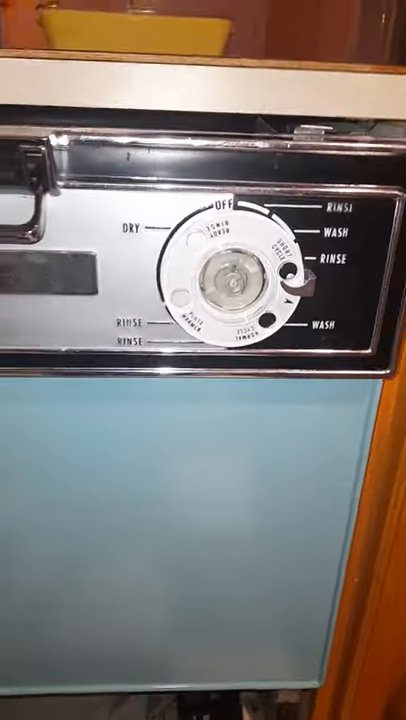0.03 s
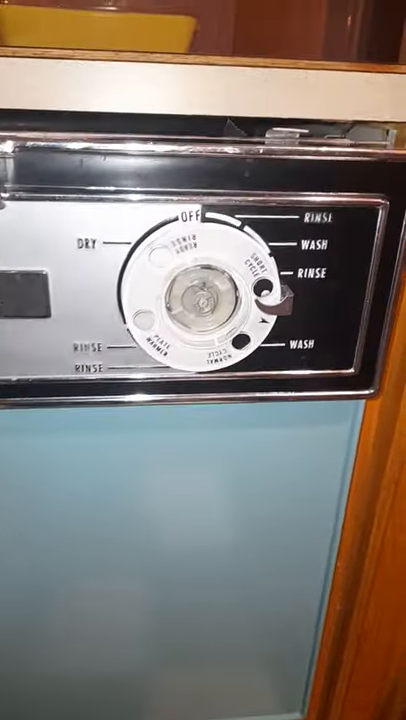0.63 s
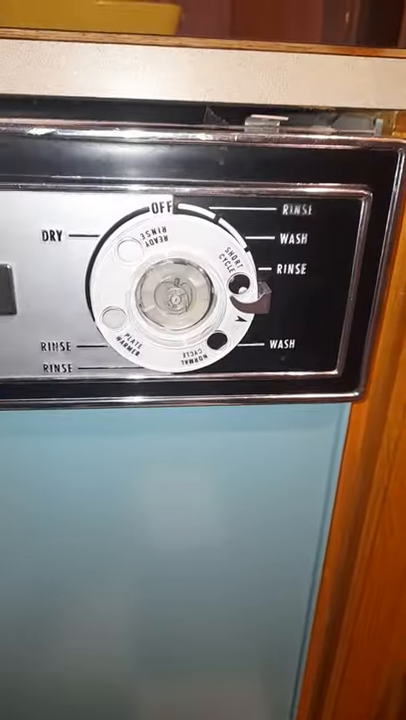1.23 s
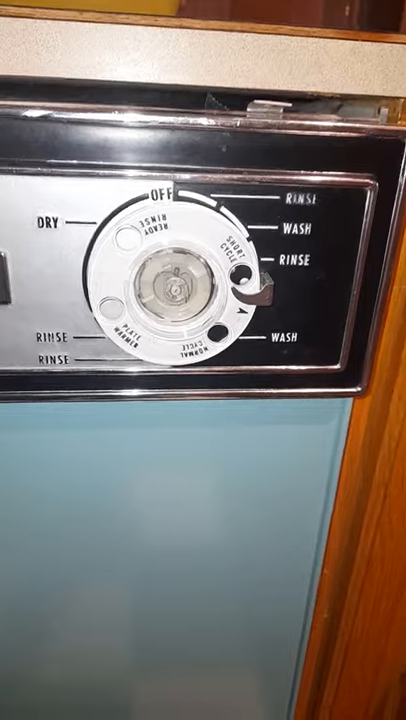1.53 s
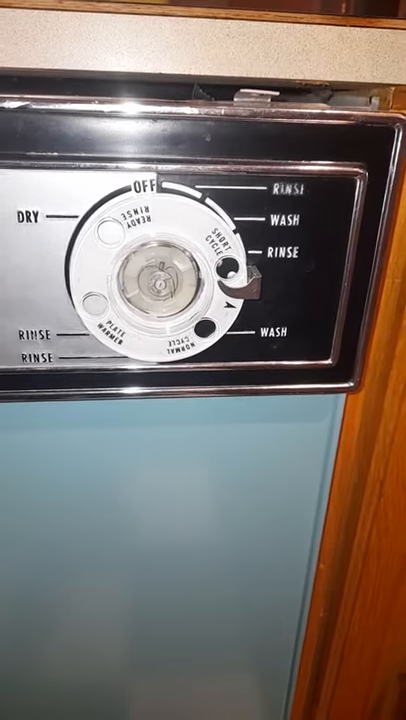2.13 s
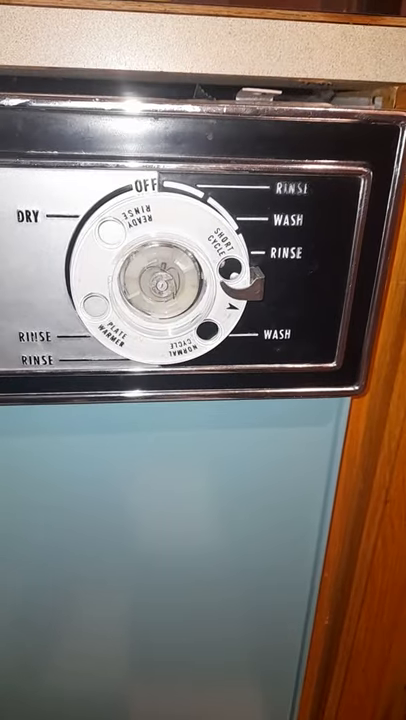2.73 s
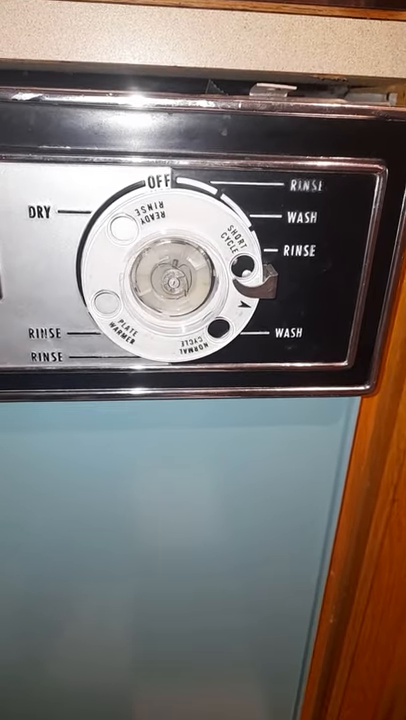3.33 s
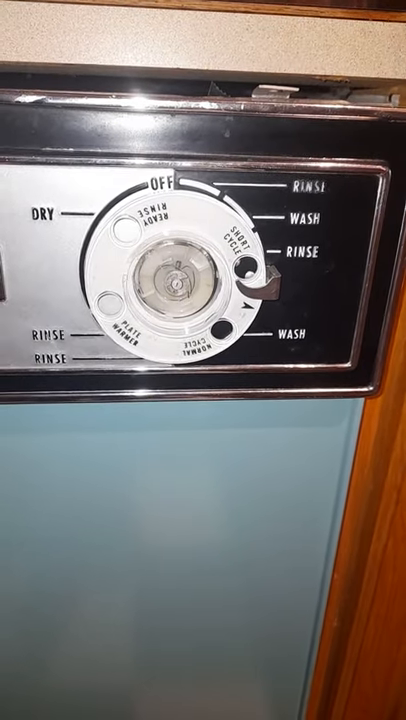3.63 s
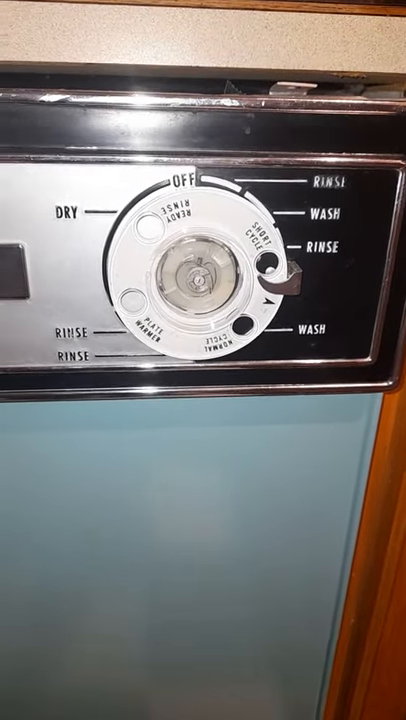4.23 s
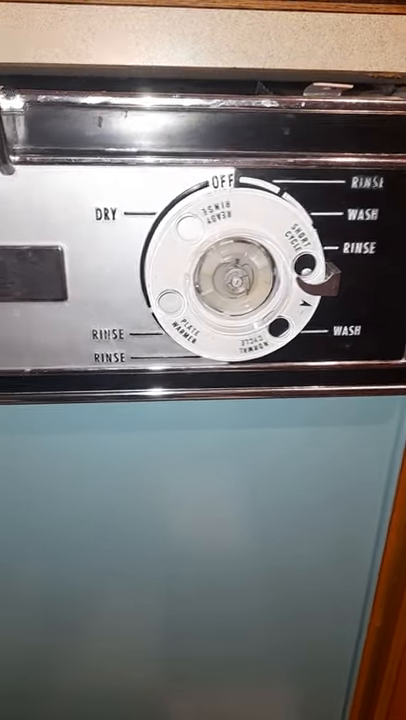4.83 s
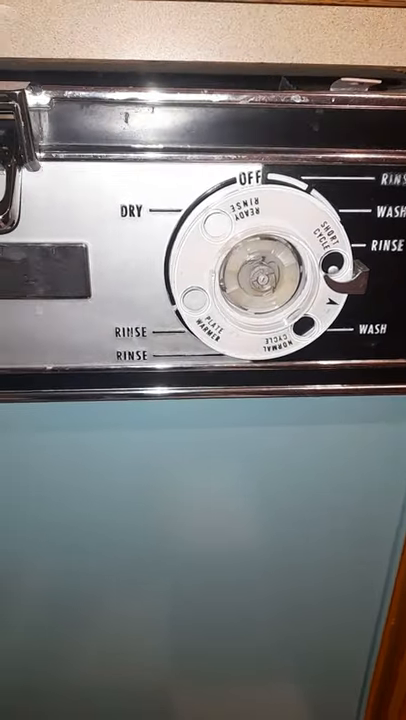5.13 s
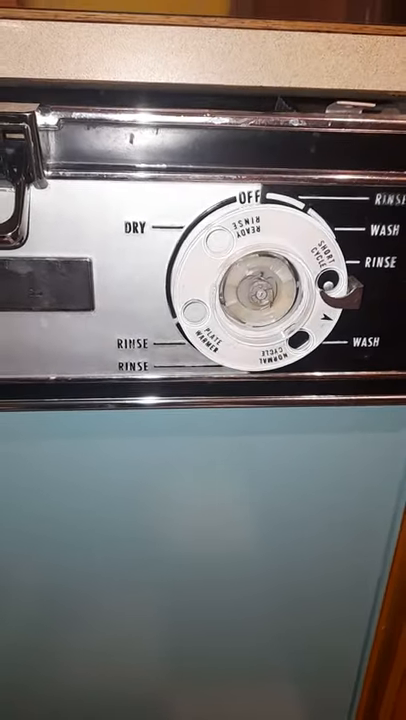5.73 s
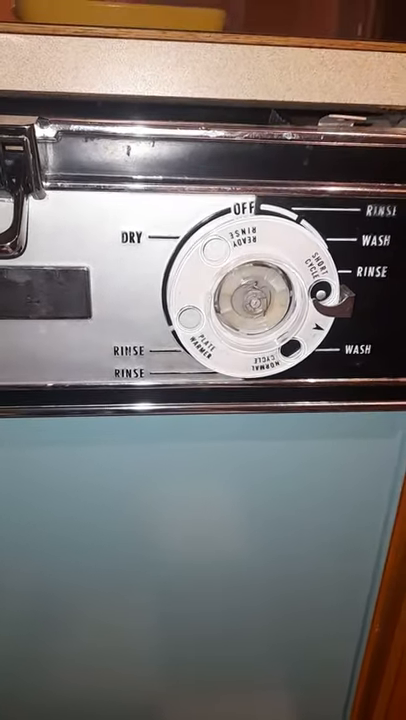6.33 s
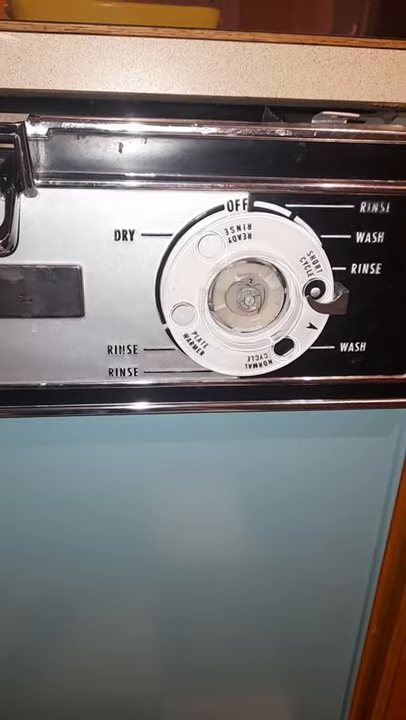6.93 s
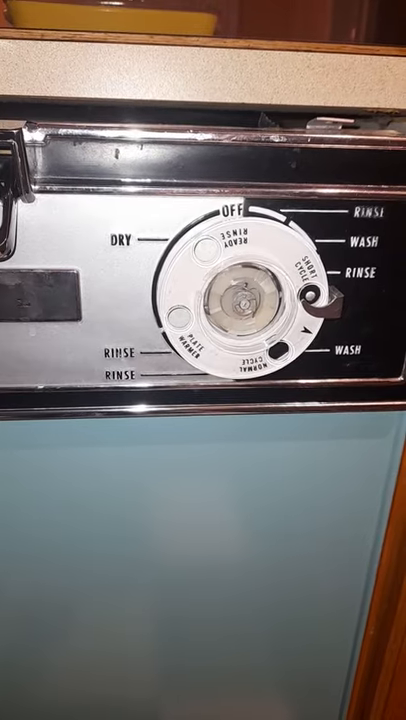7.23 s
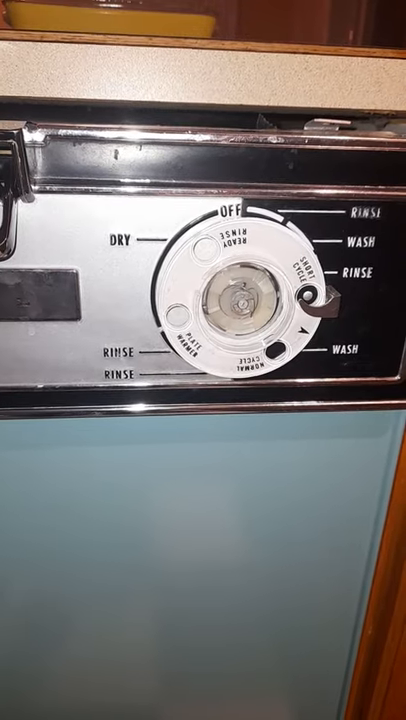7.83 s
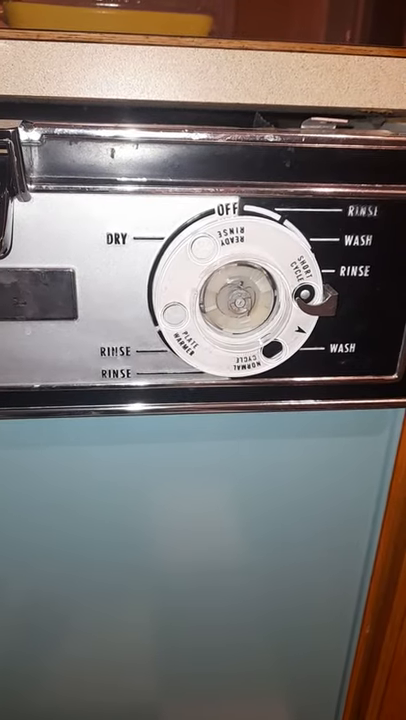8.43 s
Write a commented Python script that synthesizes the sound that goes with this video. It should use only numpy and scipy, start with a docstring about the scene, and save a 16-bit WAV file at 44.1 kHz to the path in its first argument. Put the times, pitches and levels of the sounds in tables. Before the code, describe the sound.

An old dishwasher runs in mid-cycle in a kitchen, heard close to its door. A low motor hum dominates, swelling and sagging over a steady rush of churning water. Spray sweeps in turn across the door, where it drums and fizzes, and over the racks, where dishes ring faintly. Two soft, hollow water slaps come about three seconds in, and a small sharp tick near the end.

```python
"""A motor hum over rushing, churning water: an old dishwasher in mid-cycle, close to its door.
The spray arm's jets sweep in turn over the door, where drops drum and fizz at the seal, and over
the racks, where dishes ring, the water churns and the hum sags and throbs. Pump tones flutter
under the hum; larger drops ping on the steel tub. Two slugs of water slap the walls and two
small ticks sound."""
import sys
import numpy as np
from scipy import signal
from scipy.fft import rfft, irfft, next_fast_len
from scipy.io import wavfile

SR = 44100
rng = np.random.default_rng(int(sys.argv[2]) if len(sys.argv) > 2 else 0)


def dump(signal):
    """Clip the signal to [-1, 1] and save it as 16-bit WAV at the path in sys.argv[1]."""
    limited = np.clip(np.atleast_2d(signal).T, -1, 1)
    pcm = np.round(limited * 32767).astype(np.int16)
    wavfile.write(sys.argv[1], SR, pcm)


N = 378819
TIME_S = np.arange(N) / SR
FFT_SIZE = next_fast_len(N + SR // 10)
BIN_HZ = np.maximum(np.arange(FFT_SIZE // 2 + 1) * SR / FFT_SIZE, 1)
MAINS_HZ, SHAFT_HZ = 60.02, 59.3
RACK_RISE_S, RACK_FALL_S = 0.076, 0.15

# spray falling all over the tub: (time [s], base level [dB])
WASH_LEVELS = [(0, -39), (2.3, -40), (5.2, -39.5), (7.0, -40), (8.59, -42)]
# small hard ticks: (time [s], level [dB])
TICK_EVENTS = [(2.792, -52), (7.302, -37.5)]
# water slugs on door or wall: (time [s], pitch [Hz], level [dB])
SLAP_EVENTS = [(2.835, 460, -38), (3.135, 960, -42.5)]
# jet on the door: (full-on time [s], hold [s], base drum level [dB], base fizz level [dB])
DOOR_JETS = [(.91, 0.15, -40.5, -56.5), (2.644, 0.27, -40.5, -57.5), (3.15, 0.57, -47.5, -76),
             (4.34, 0.13, -43, -59), (4.84, 0.81, -44.5, -59.5), (5.996, 0.069, -45, -77),
             (7.386, 0.057, -39.5, -57)]
# jet on the racks: (full-on time [s], hold [s], plate gain [x], bowl gain [x], mean hum sag [dB])
RACK_JETS = [(0.273, 0.14, 0.66, 1.14, 0.2), (1.506, .12, 1.05, 0.85, 1.4), (3.32, 0.22, 0.84, .9, 5.5),
             (4.7, .9, .35, 0.23, -0.35), (5.79, 0.14, 0.9, 0.6, 0.6), (6.463, 0.13, 1.15, .85, 3),
             (7.676, 0.44, 1.15, 0.8, 2.6), (8.27, .32, .85, 0.46, 0.6)]
# jet on a pan: (full-on time [s], hold [s])
PAN_JETS = [(8.05, 0.2)]
# water stirred up: (full-on time [s], hold [s], base level [dB])
CHURN_EVENTS = [(0, 0.13, -34), (1.346, 0.56, -35.8), (3.267, 0.33, -33.5), (5.793, 0.13, -31.5),
                (6.45, 0.15, -39), (7.62, .3, -44), (8.54, .05, -37.5)]
# motor hum before sag: (time [s], base level [dB])
HUM_LEVELS = [(0.0, -15.5), (0.31, -16), (0.54, -18.5), (1.12, -18.2), (1.32, -16.5), (1.64, -19.9),
              (2.1, -14), (2.55, -19.6), (3.23, -17.5), (3.99, -15.5), (4.28, -19.1), (4.53, -17.5),
              (4.76, -20.5), (5.84, -21), (6.18, -14.6), (6.82, -17), (7.11, -17), (7.46, -19.2),
              (7.54, -14.5), (7.8, -21.5), (8.29, -19.5), (8.59, -18.5)]
# motor tones: (frequency [x mains rate], gain [dB])
MOTOR_HARMONICS = [(2, 0), (4, -35.5)]
# pump tones: (frequency [x shaft rate], base level [dB], flutter depth [x], swell [dB/dB of churn])
PUMP_HARMONICS = [(1, -49.5, 0.3, .05), (3, -42.5, 0.4, 0.73), (6, -48.5, 0.52, 0.44)]
# door panel and tub resonances: (frequency [Hz], width [Hz], lift [dB])
PANEL_RESONANCES = [(229.4, 17, 9), (290.5, 23, 5.5), (433, 19, 2), (458, 17, 7.5), (516.3, 12.5, 8.5),
                    (534, 18, 7), (594, 29, 7.5), (666, 28, 8), (802, 33, 3), (825, 24, 5),
                    (953.5, 20, 9.5), (1014, 31, 6), (1112, 27, 6.5), (1530, 35, 5.5), (1675, 36, 3.5),
                    (1847, 34, 0), (1880, 34, 7), (2236, 96, 4), (3000, 190, 1)]
# ring of steel walls, plates and glasses, bowl, pan: (frequency [Hz], width [Hz], gain [dB])
WALL_RESONANCES = [(949.5, 18, 10.5), (1024, 17, -2), (1805, 21, 11), (1858, 10.3, 8)]
PLATE_RESONANCES = [(3635, 30, 0), (3700, 32, -7.5), (4060, 17, -0.5), (4410, 40, -7), (4626, 70, -0.5),
                    (4720, 42, -17), (4820, 70, -2.5), (5060, 36, 0.5), (5400, 270, -10.5), (6800, 50, -10)]
BOWL_RESONANCES = [(2020, 40, -10), (2110, 24, -2), (2170, 26, -2), (2228, 26, -7), (2745, 22, 2)]
PAN_RESONANCES = [(822, 4, -9), (1550, 17, -19)]
# source spectra: (frequency [Hz], relative density [dB])
WASH_SHAPE = [(30, -10.5), (90, 20), (250, -1.5), (340, 10), (395, -9.5), (700, 0.5), (1300, -3),
              (2000, 1.5), (3300, -5.5), (5000, -6.5), (6500, -6.5), (7300, -20.5), (8500, -26.5),
              (16000, -47)]
TICK_SHAPE = [(500, -8), (1800, -2), (2800, 22), (4000, -1), (8000, 4), (13000, 12), (16000, 3)]
FIZZ_SHAPE = [(3000, -38), (6500, -2.5), (8500, -10), (10000, -4), (11800, 0.5), (12750, 3.5),
              (13500, -7.5), (14500, 0), (16000, -13)]
DRUM_SHAPE = [(60, -9), (200, 5.5), (330, 2), (450, 3.5), (800, -3), (1300, -1), (2500, -7.5),
              (3500, -14.5), (6500, -33), (9000, -37)]
SUMP_SHAPE = [(20, -48), (48, -42), (66, -27), (80, 4), (100, 4.5), (135, 3.5), (165, 3.5), (200, -0.5),
              (215, -7.5), (300, -15), (500, -49)]
# sound field: (frequency [Hz], left-right correlation [-1..1])
STEREO_CORRELATION = [(60, 0.34), (160, .99), (270, 0.7), (450, 0.75), (740, 0.79), (1220, -0.096),
                      (2010, -0.27), (3330, -0.091), (5500, 0.025), (15000, 0)]
# microphone port colour: (frequency [Hz], left minus right [dB])
PORT_BALANCE = [(60, -7.5), (130, -2), (250, -2), (800, -1.8), (1200, 0), (1800, -5), (2700, -5),
                (4000, -2), (5300, -7.5), (6400, -9.5), (7100, -1), (8000, 8), (10000, 0.5), (12500, -2.5)]


def from_db(db):
    """Decibels to gain."""
    return 10 ** (np.asarray(db) / 20)


def over_time(points):
    """Table interpolated at every sample."""
    return np.interp(TIME_S, *np.transpose(points))


def over_hz(points):
    """Table interpolated over log frequency."""
    hz, value = np.transpose(points)
    return np.interp(np.log(BIN_HZ), np.log(hz), value)


def drift(rate_hz, step=40):
    """Slow random wander, rms 1: coarse noise through a two-pole low-pass."""
    pole = np.exp(-2 * np.pi * step * rate_hz / SR)
    noise = rng.standard_normal(N // step + 2002)
    slow = signal.lfilter([1], [1, -2 * pole, pole * pole], noise)[2000:]
    return np.interp(np.arange(N) / step, np.arange(len(slow)), slow / np.sqrt(np.mean(slow ** 2)))


def resonance(hz, width_hz):
    """One damped mode, peak gain 1."""
    return 1 / (1 + 1j * (BIN_HZ ** 2 - hz ** 2) / (BIN_HZ * width_hz))


def turbulence():
    """Two independent white noise streams."""
    return rng.standard_normal((2, FFT_SIZE))


def drops(per_s, spread_db):
    """Two streams of random impacts, many small, few large."""
    sizes = from_db(spread_db * np.minimum(rng.exponential(1, (2, FFT_SIZE)), 4))
    return sizes * np.sign(turbulence()) * (rng.random((2, FFT_SIZE)) < per_s / SR)


def radiate(streams, response):
    """Filter two streams into stereo: alike in the bass, diffuse in the treble; mid rms 1."""
    mid, side = rfft(streams) * response
    correlation = over_hz(STEREO_CORRELATION)
    side = side * np.sqrt((1 - correlation) / (1 + correlation))
    pair = irfft(np.array([mid + side, mid - side]), FFT_SIZE)[:, :N]
    return pair / np.sqrt(np.mean(pair.mean(axis=0) ** 2))


def sweeps(passes, rise_s, fall_s, lead_s=0):
    """One 0-1 envelope per pass: Gaussian rise, hold, Gaussian fall."""
    start_s, hold_s = np.transpose(passes)[:2, :, None]
    since_s = TIME_S + lead_s - start_s
    rise = np.minimum(since_s, 0) / rise_s
    fall = np.maximum(since_s - hold_s, 0) / fall_s
    return np.exp(-np.minimum(rise ** 2 + fall ** 2, 50))


def power_sum(envelopes, gains):
    """Overlapping passes add in power."""
    return np.sqrt(np.square(gains) @ envelopes ** 2)


def total_db(envelopes, peaks_db, rest_db):
    """Passes on top of a resting level."""
    return 20 * np.log10(np.hypot(power_sum(envelopes, from_db(peaks_db)), from_db(rest_db)))


def tub_echoes(echo_db=-14, t60_s=0.28, corner_hz=900):
    """Echoes between steel walls comb the spectrum; the tub is too small to echo bass."""
    tail = rng.standard_normal(SR // 2) * from_db(-60 * TIME_S[:SR // 2] / t60_s)
    echoes = rfft(tail / np.sqrt(np.sum(tail ** 2)), FFT_SIZE)
    return np.abs(1 + from_db(echo_db) * echoes * BIN_HZ / (BIN_HZ + corner_hz))


def door_response():
    """The door passes sound best at its panel modes."""
    return from_db(sum(db * np.abs(resonance(hz, width)) ** 2 for hz, width, db in PANEL_RESONANCES))


def wash(panel, wash_db, surge_db=0.55):
    """Steady rush of spray in the tub, heard through the door."""
    rush = radiate(turbulence(), from_db(over_hz(WASH_SHAPE)) * panel)
    return from_db(wash_db + surge_db * drift(rate_hz=6)) * rush


def wall_pings(wash_db, base_db=-52, swell_db_per_db=3.9):
    """Larger drops ping on the steel walls, harder in heavy spray."""
    modes = sum(from_db(db) * resonance(hz, width) for hz, width, db in WALL_RESONANCES)
    level_db = base_db + swell_db_per_db * (wash_db - wash_db.mean())
    return from_db(level_db) * radiate(drops(per_s=60, spread_db=1.5), modes)


def ticks(t60_s=0.083):
    """Short bright ticks dying away in the room."""
    envelope = sum((TIME_S >= at_s) * from_db(db - 60 * np.clip((TIME_S - at_s) / t60_s, 0, 2))
                   for at_s, db in TICK_EVENTS)
    return envelope * radiate(turbulence(), from_db(over_hz(TICK_SHAPE)))


def slaps(panel, hold_s=0.01, width_hz=72):
    """Hollow knocks of water slugs, coloured by the door."""
    envelopes = sweeps([(at_s, hold_s) for at_s, _, _ in SLAP_EVENTS], rise_s=0.0086, fall_s=0.02)
    return sum(from_db(db) * envelope * radiate(turbulence(), resonance(hz, width_hz) * panel)
               for (_, hz, db), envelope in zip(SLAP_EVENTS, envelopes))


def jets_on_door(wash_db):
    """Drum and fizz levels: a jet's fine edge leads its core; stray drops fill the gaps."""
    _, _, drum_db, fizz_db = np.transpose(DOOR_JETS)
    core = sweeps(DOOR_JETS, rise_s=0.2, fall_s=0.17)
    mist = sweeps(DOOR_JETS, rise_s=0.32, fall_s=0.27, lead_s=0.074)
    stray_db = 1.1 * (wash_db - wash_db.mean())
    return total_db(core, drum_db, rest_db=stray_db - 47), total_db(mist, fizz_db, rest_db=stray_db - 61.5)


def seal_fizz(echoes, fizz_db, trim_db=2.5):
    """Fine droplets fizz at the door seal."""
    droplets = drops(per_s=16000, spread_db=2.0)
    return from_db(fizz_db + trim_db) * radiate(droplets, from_db(over_hz(FIZZ_SHAPE)) * echoes)


def door_drumming(panel, drum_db, trim_db=2.0, splash_db=1.0):
    """Drops drum on the door as a jet crosses it."""
    patter = radiate(drops(per_s=6000, spread_db=2.0), from_db(over_hz(DRUM_SHAPE)) * panel)
    return from_db(drum_db + trim_db + splash_db * drift(rate_hz=20)) * patter


def jets_on_racks(throb_hz=8.1, throb_depth=0.48):
    """Each pass drives plates and bowl and makes the hum sag and throb."""
    start_s, _, plate_gain, bowl_gain, sag_db = np.transpose(RACK_JETS)
    jets = sweeps(RACK_JETS, RACK_RISE_S, RACK_FALL_S)
    throb = 1 + throb_depth * np.cos(2 * np.pi * throb_hz * (TIME_S - start_s[:, None]))
    return power_sum(jets, plate_gain), power_sum(jets, bowl_gain), sag_db @ (jets * throb)


def ringing(modes):
    """Dense drops keep an object's modes ringing."""
    power = sum(np.abs(from_db(db) * resonance(hz, width)) ** 2 for hz, width, db in modes)
    return radiate(drops(per_s=9000, spread_db=2.5), np.sqrt(power))


def dishes(plate_jet, bowl_jet, pulse_depth=0.22):
    """Plates, bowl and pan ring under the jets; their ringing pulses at twice the mains rate."""
    pan_jet = sweeps(PAN_JETS, RACK_RISE_S, RACK_FALL_S).sum(axis=0)
    plates = from_db(-49) * plate_jet * ringing(PLATE_RESONANCES)
    bowl = from_db(-47) * bowl_jet * ringing(BOWL_RESONANCES)
    pan = from_db(-48) * pan_jet * ringing(PAN_RESONANCES)
    pulse = 1 + pulse_depth * np.sin(4 * np.pi * MAINS_HZ * TIME_S)
    return pulse * (plates + bowl + pan)


def churning():
    """Level of stirred water: flares fast, settles slowly."""
    flares = sweeps(CHURN_EVENTS, rise_s=0.04, fall_s=0.38)
    return total_db(flares, peaks_db=np.transpose(CHURN_EVENTS)[2], rest_db=-43)


def sump(churn_db, trim_db=1.5):
    """Low rumble of water tumbling through the tub."""
    return from_db(churn_db + trim_db) * radiate(turbulence(), from_db(over_hz(SUMP_SHAPE)))


def pump(churn_db, wander_hz=0.17, flutter_hz=4):
    """Impeller just under the mains rate; its tones flutter, and swell with the churning."""
    angle_rad = 2 * np.pi * np.cumsum(SHAFT_HZ + wander_hz * drift(rate_hz=1.26)) / SR
    load_db = churn_db - churn_db.mean()
    tones = 0
    for order, db, flutter, swell in PUMP_HARMONICS:
        sway = 1 + flutter * (drift(flutter_hz) + 1j * drift(flutter_hz)) / np.sqrt(2)
        tones += from_db(db + swell * load_db) * np.real(sway * np.exp(1j * order * angle_rad))
    return np.sqrt(2) * tones


def motor(hum_db, churn_db, load, trim_db=0.15, lag_rad=0.27, shake_hz=14):
    """Magnetic hum at twice the mains rate; lags under the water's load, shaken by the churning."""
    mains_rad = 2 * np.pi * MAINS_HZ * TIME_S - lag_rad * load / 2
    hum = sum(from_db(db) * np.sin(order * mains_rad) for order, db in MOTOR_HARMONICS)
    shake = drift(shake_hz) * np.sin(2 * mains_rad) + drift(shake_hz) * np.cos(2 * mains_rad)
    return np.sqrt(2) * from_db(hum_db + trim_db) * hum + from_db(churn_db) * shake


def scene():
    """Motor and pump centred, water all around."""
    wash_db, churn_db = over_time(WASH_LEVELS), churning()
    drum_db, fizz_db = jets_on_door(wash_db)
    plate_jet, bowl_jet, sag_db = jets_on_racks()
    echoes = tub_echoes()
    panel = door_response() * echoes
    machine = motor(over_time(HUM_LEVELS) - sag_db, churn_db, load=plate_jet) + pump(churn_db)
    water = sump(churn_db) + wash(panel, wash_db)
    spray = door_drumming(panel, drum_db) + seal_fizz(echoes, fizz_db) + wall_pings(wash_db)
    return machine + water + spray + dishes(plate_jet, bowl_jet) + ticks() + slaps(panel)


def record(dry, cutoff_hz=15720):
    """Two microphone ports, each with its own colour; steep top cut."""
    ports = from_db(over_hz(PORT_BALANCE) * np.array([[0.5], [-0.5]]))
    ports /= np.sqrt(np.mean(ports ** 2, axis=0))
    low_pass = 1 / np.sqrt(1 + (BIN_HZ / cutoff_hz) ** 800)
    return irfft(rfft(dry, FFT_SIZE) * ports * low_pass, FFT_SIZE)[:, :N]


dry = scene()
out = record(dry)
dump(out)
```